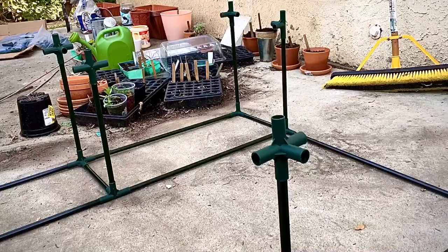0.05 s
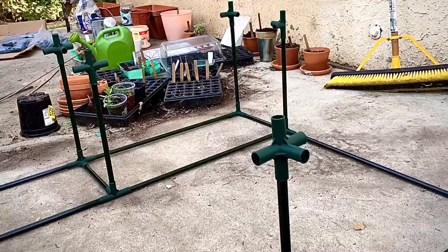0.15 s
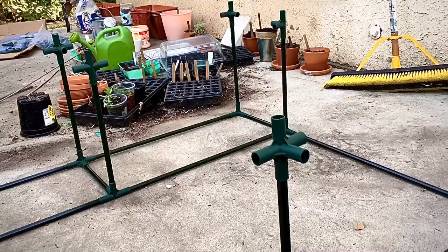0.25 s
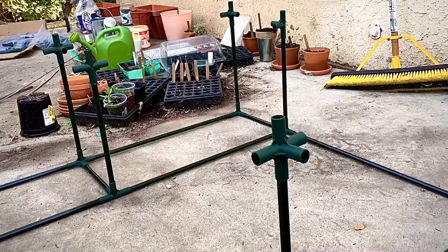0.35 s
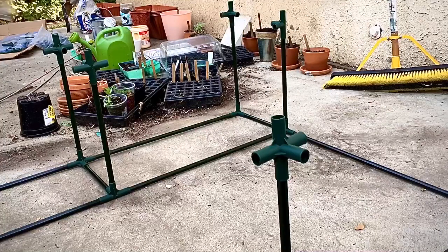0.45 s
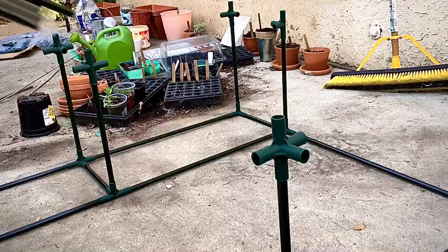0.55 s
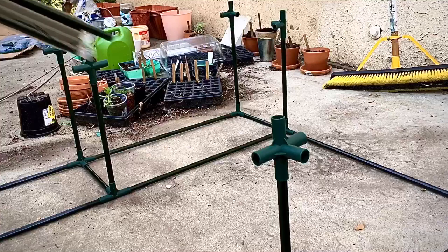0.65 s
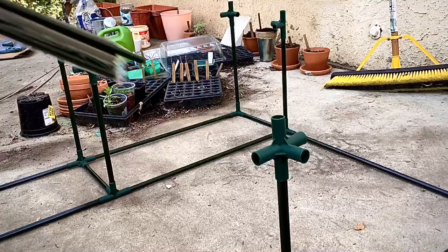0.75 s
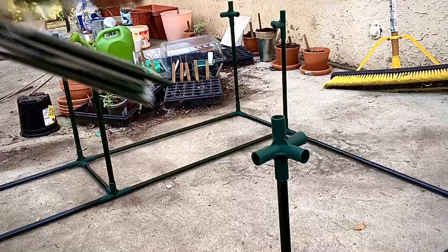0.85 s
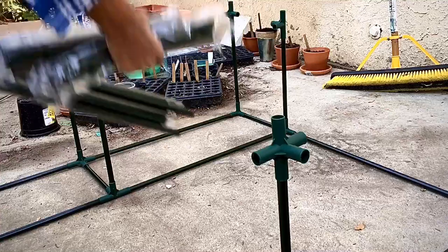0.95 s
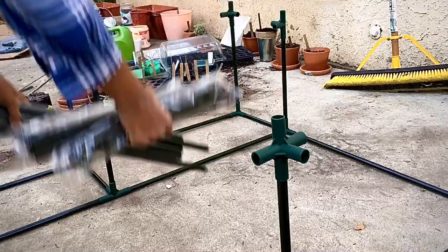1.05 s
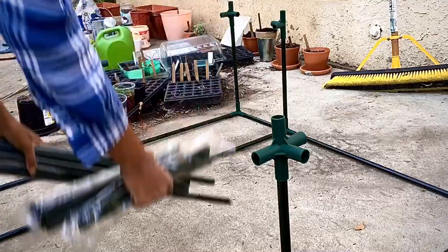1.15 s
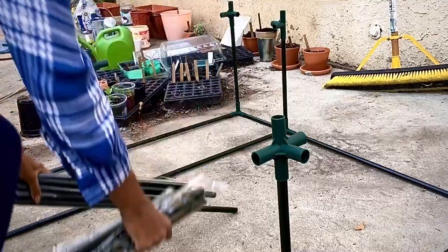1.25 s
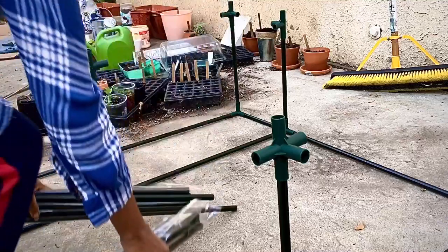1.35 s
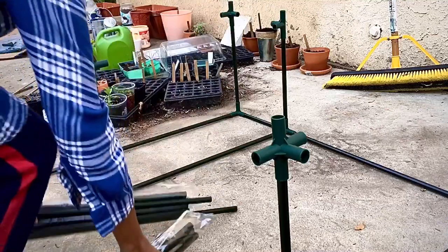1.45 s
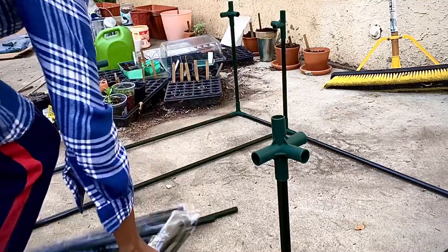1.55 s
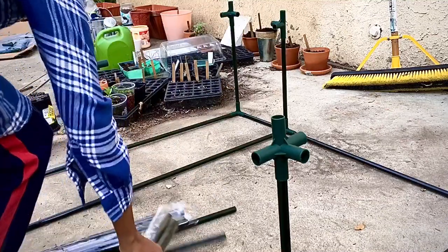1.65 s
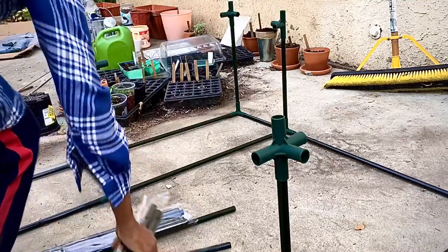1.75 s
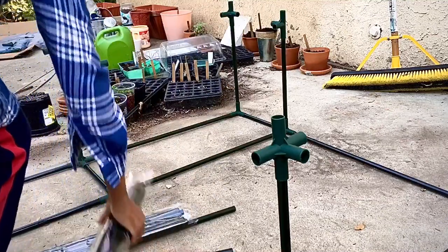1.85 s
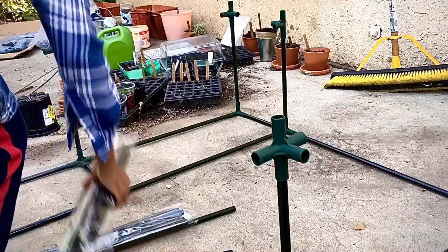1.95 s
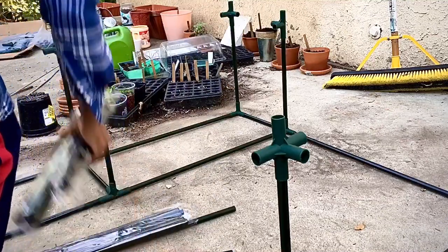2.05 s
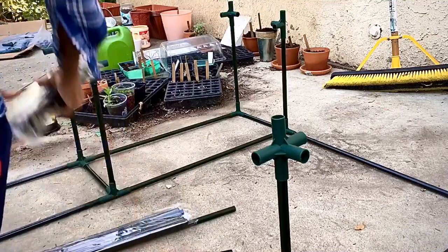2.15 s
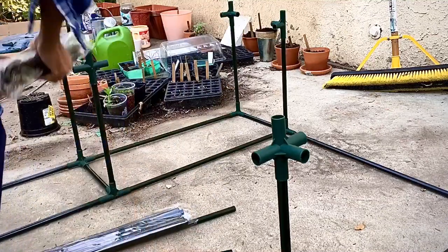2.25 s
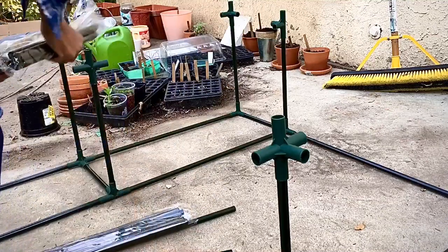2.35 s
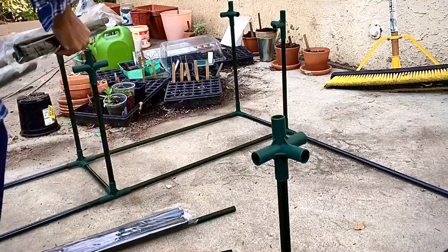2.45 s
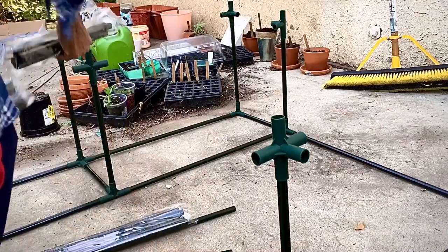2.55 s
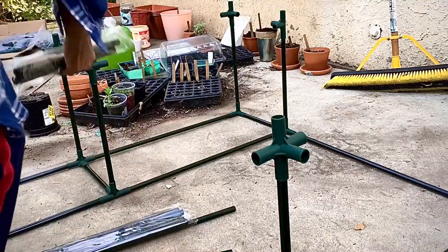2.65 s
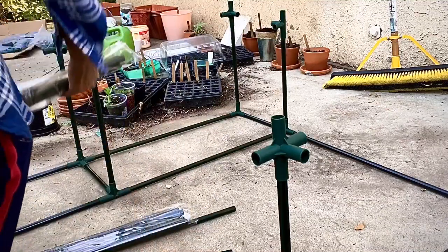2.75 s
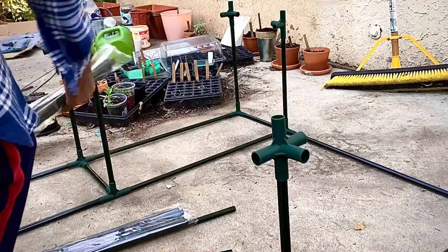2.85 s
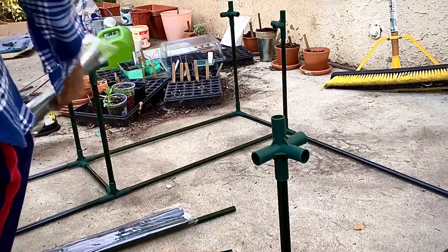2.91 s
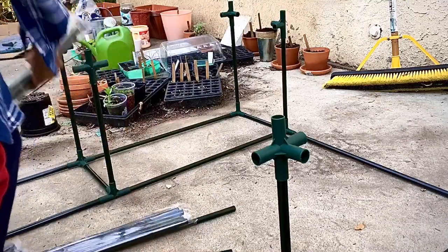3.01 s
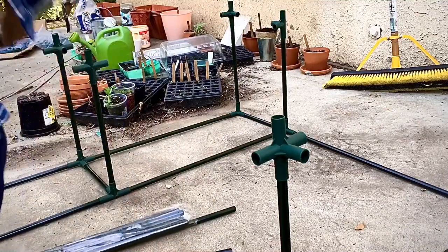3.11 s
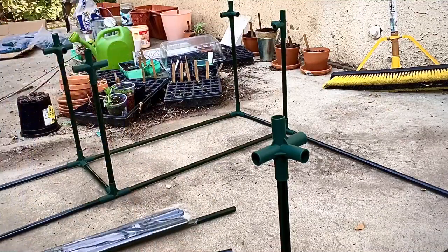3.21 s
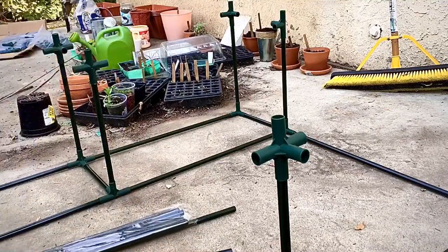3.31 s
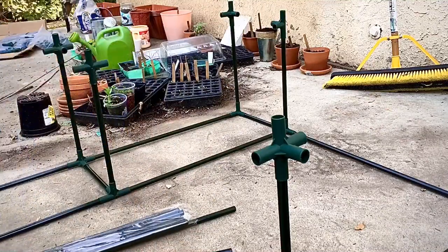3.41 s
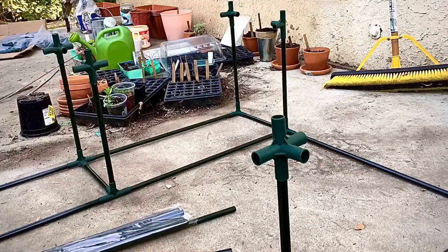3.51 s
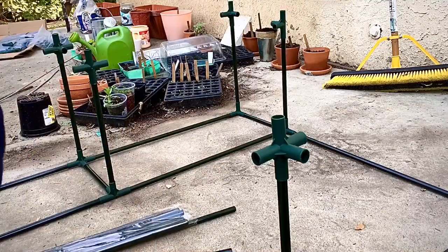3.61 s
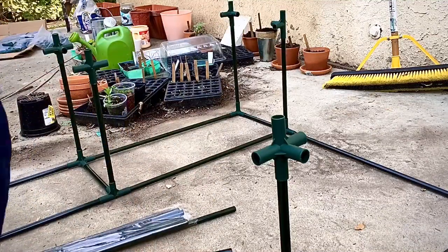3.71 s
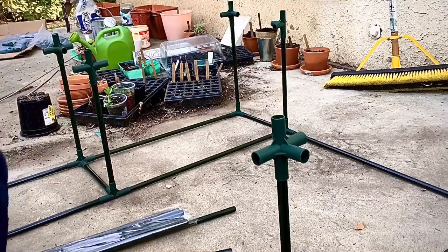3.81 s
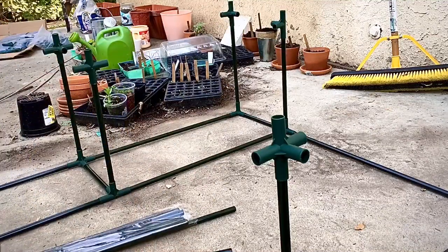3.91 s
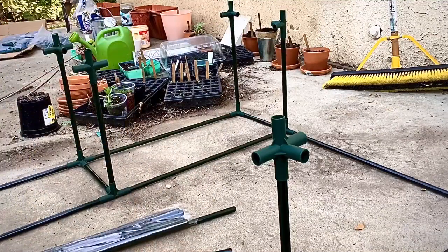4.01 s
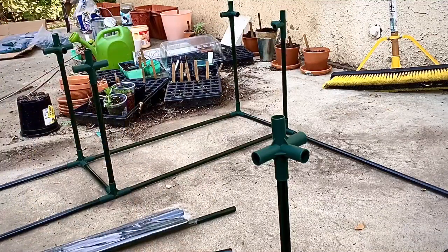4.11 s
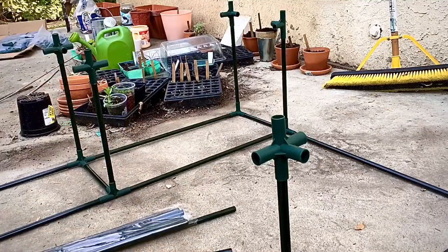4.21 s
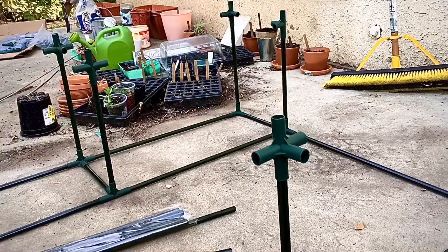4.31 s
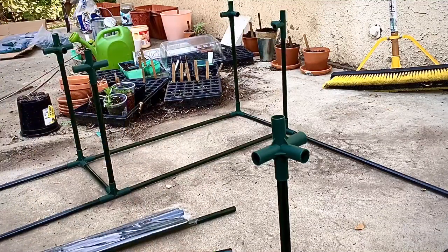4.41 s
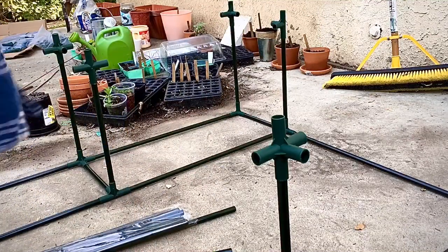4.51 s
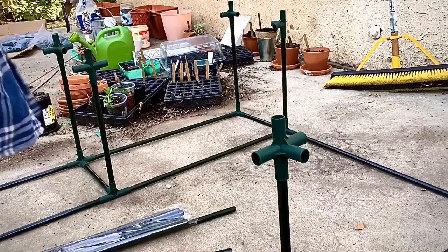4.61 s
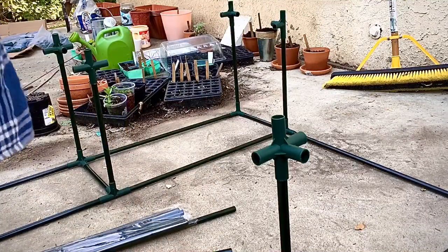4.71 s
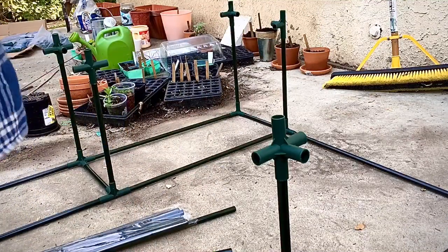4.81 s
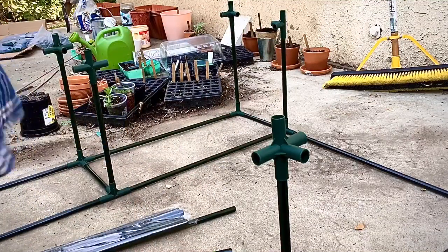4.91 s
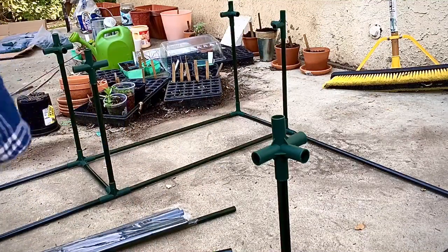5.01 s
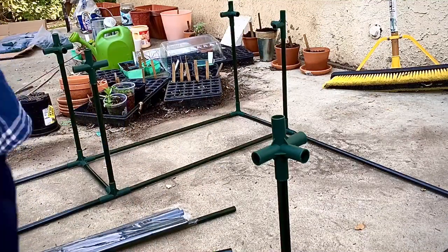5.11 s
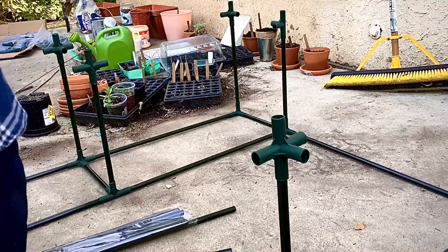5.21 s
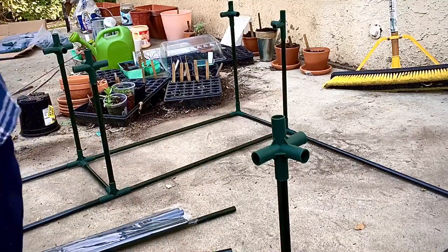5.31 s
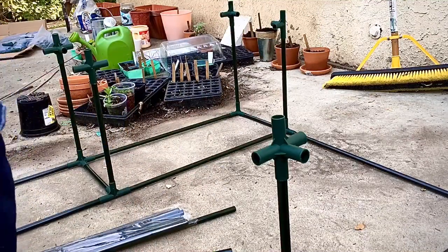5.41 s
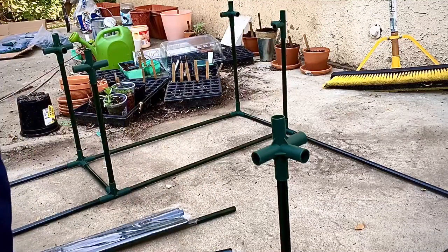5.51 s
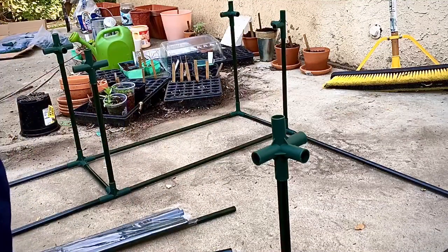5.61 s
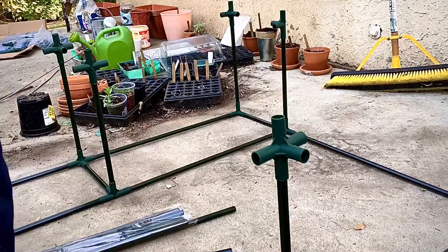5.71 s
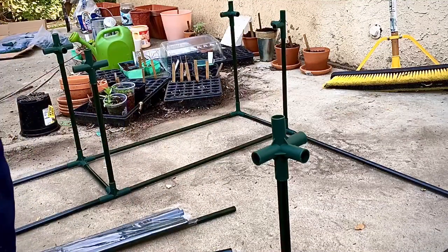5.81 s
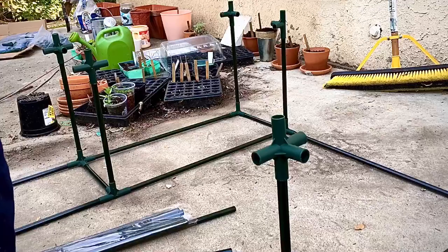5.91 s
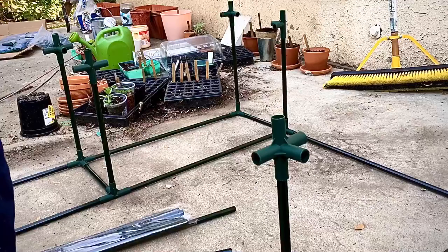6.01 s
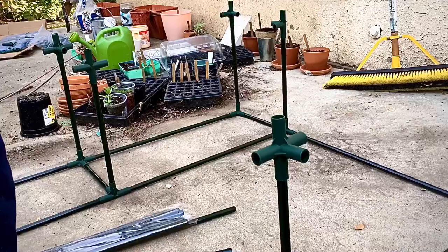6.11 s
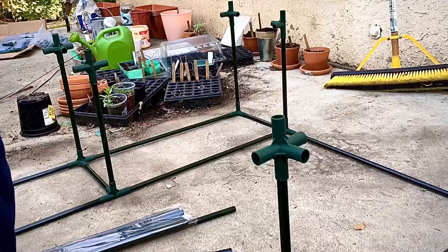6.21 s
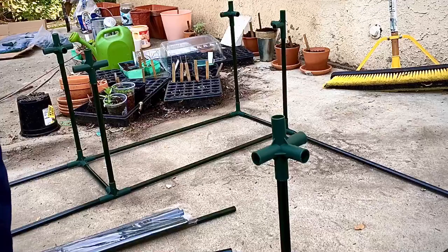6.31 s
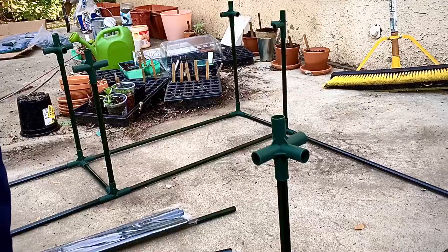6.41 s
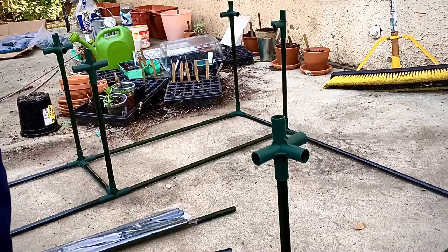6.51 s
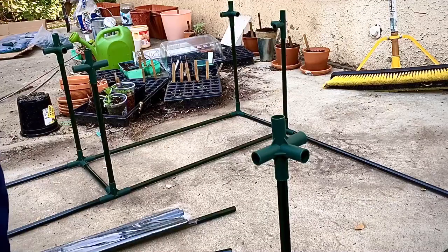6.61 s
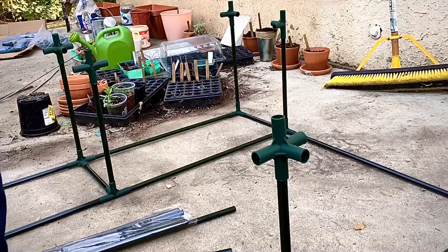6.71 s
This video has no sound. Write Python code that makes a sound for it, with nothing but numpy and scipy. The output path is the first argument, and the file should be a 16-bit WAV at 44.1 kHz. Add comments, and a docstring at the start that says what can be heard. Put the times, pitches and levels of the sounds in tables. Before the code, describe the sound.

Plastic-wrapped metal tubes crash down on a patio, jingling to rest, a second bundle knocks, then crisp plastic crackling with faint clinks.

```python
"""Concrete patio: bundles of thin steel poles in plastic sleeves are carried, knocked and laid down.
Sleeves rustle and snap: gated grit noise, noise bursts and short sine pings.
Bundles crash: noise bursts through clatter, tube and thud filters. Poles roll, ring and clink: sums of tube modes.
Far traffic rumbles (shaped noise) with a low hum (wavering sines); the recorder ducks its gain after loud crashes."""
import sys
import numpy as np
from scipy import signal
from scipy.fft import rfft, irfft, next_fast_len
from scipy.io import wavfile
from scipy.ndimage import uniform_filter1d, map_coordinates

SR = 44100
rng = np.random.default_rng(int(sys.argv[2]) if len(sys.argv) > 2 else 0)


def waveform_to_disk(signal):
    """Save audio, clipped to [-1, 1], as 16-bit WAV at the path in sys.argv[1]."""
    frames = np.transpose(np.atleast_2d(signal))
    scaled = np.clip(frames, -1, 1) * 32767
    samples = np.round(scaled).astype(np.int16)
    wavfile.write(sys.argv[1], SR, samples)


N = 297675

# far traffic rumble spectrum: (frequency [Hz], relative level [dB per Hz])
TRAFFIC_SPECTRUM = [(12, -72), (20, -48), (43, -6), (65, -6), (113, 4.5), (150, -5.5), (228, -7.5),
                    (310, -12.5), (410, -20.5), (542, -20), (624, -20.5), (678, -22), (1190, -22),
                    (1660, -32), (16000, -62)]
# hum fundamental: (time [s], level [dB])
HUM_LEVELS = [(0, -49), (.4, -56.5), (1.0, -44), (1.9, -58.5), (3.0, -47.5), (3.4, -47.5), (4.2, -42),
              (5.0, -50), (6.0, -40.5), (6.75, -52)]
# hum overtones: (multiple of the fundamental [1], level [dB])
HUM_OVERTONES = [(3, -62), (4, -61)]
# sleeves sliding in the hands: (start [s], length [s], rustle [dB], change by the end [dB],
# low part above rustle [dB])
SLIDES = [(0.654, .12, -59, -0.5, -3.5), (.79, .34, -72.5, 14, 1.5), (1.172, .13, -54, 3, 7),
          (1.331, .1, -55.5, 11.5, 6), (1.592, .12, -48, 4.5, 6.5), (1.75, .3, -51, -5.5, 4.5),
          (2.131, .13, -58.5, 6.5, 4.5), (2.31, .4, -75, -0.5, 3), (2.811, 0.16, -51.5, -16, 0.5),
          (3.11, .2, -30.5, -24.5, 1.5), (3.314, .1, -52, 2, 3.5), (3.426, 0.065, -68.5, -9, 4),
          (3.651, .12, -44.5, -14, 4), (3.8, .08, -53.5, -3.5, 3.5), (3.919, 0.21, -53, -3, 2),
          (4.155, 0.16, -50, -5.5, 1.5), (4.337, 0.12, -49.5, -4.5, 5.5), (4.49, 0.049, -64, -2, 2),
          (4.558, .1, -61.5, -11, 9.5), (4.688, 0.024, -57, -4.5, 1), (4.73, 0.12, -71, 0, 8),
          (4.843, .11, -47, -13.5, 4.5), (4.96, .04, -61.5, -4, 8.5), (5.012, .05, -50.5, -13, 5),
          (5.086, .06, -73, 0, -2), (5.15, .11, -61.5, -3, 0), (5.27, .24, -48.5, -13, 2.5),
          (5.531, .1, -70, 7.5, -2), (5.661, .25, -50, -5, 4.5), (5.935, .06, -64.5, -7, 3),
          (5.98, .19, -57.5, 15, -4), (6.22, .19, -54, 0.5, 3.5), (6.416, .2, -47.5, -10.5, -3.5),
          (6.645, .05, -40, -22, -6), (6.738, .03, -47.5, -16.5, 1)]
# folds snapping: (time [s], crack [dB], low part above crack [dB])
SNAPS = [(.6478, -44.5, -15), (0.6781, -29, -7), (0.6893, -38, -10), (0.7462, -23, -27), (0.835, -37, -24),
         (0.906, -46.5, -1), (0.9964, -41.5, 6), (1.0768, -40.5, -27), (1.1065, -52, 6), (1.2659, -33, -17),
         (1.395, -36.5, -21), (1.982, -24.5, -11.5), (2.1485, -37, 2.5), (2.2228, -37.5, -11),
         (2.2565, -40.5, -12), (2.3624, -36, 0.5), (2.4654, -38, -19), (2.5299, -36, -0.5),
         (2.5626, -31, -25), (2.669, -34.5, -23), (2.8148, -37.5, -10.5), (3.344, -32, -7),
         (3.48, -49, 0.5), (3.642, -36, -16), (3.717, -36, -22), (3.7622, -31, -8), (3.815, -33, 0),
         (3.8387, -31, -6.5), (3.8797, -35, 1.5), (3.927, -36.5, -3), (3.9907, -35, -28),
         (4.0333, -40.5, -23), (4.129, -42.5, -28), (4.158, -37.5, 5.5), (4.1745, -29, -32),
         (4.2198, -29, -8), (4.23, -34, -19), (4.2567, -30, -30), (4.335, -35, -24), (4.35, -36.5, -3),
         (4.4283, -31.5, -21), (4.459, -30, -33), (4.563, -31.5, -6.5), (4.601, -32.5, -17),
         (4.6476, -37, -12), (4.6923, -33.5, -0.5), (4.8377, -31, -9), (4.8852, -22.5, -10),
         (5.013, -28.5, -26), (5.148, -36, -15), (5.2011, -32.5, -14), (5.2692, -31.5, -2),
         (5.2885, -26.5, -20), (5.5486, -32, -11), (5.6045, -36.5, -10), (5.6693, -30, -20),
         (5.7988, -20, -27), (6.0014, -33, -27), (6.0547, -38, -4), (6.1116, -34, -4), (6.195, -29.5, -30),
         (6.22, -32, -14), (6.5168, -38.5, 1), (6.5524, -44, 5), (6.6124, -41, -10)]
# film spectra, crack and low part: (frequency [Hz], relative level [dB per Hz])
FILM_HIGH_SPECTRUM = [(1180, -26), (2000, -12), (4120, 0.5), (4450, -6.5), (5350, 0), (11400, 2),
                      (15200, -2), (16000, -5)]
FILM_LOW_SPECTRUM = [(240, -10), (400, 1), (500, -7), (588, 1.5), (773, -5), (1750, -0.5), (4500, -8.5),
                     (5850, -10), (9900, -120)]
# bundle crashes: (time [s], clatter [dB], low thud above clatter [dB], higher knock above clatter [dB],
# rise [s], T60 [s])
CRASHES = [(1.1403, -16.5, -8, -24, 0.0036, 0.11), (1.1556, -22.5, -19.5, -22.5, 0.0013, 0.13),
           (1.4462, -26.5, -10.5, -14, 0.0028, 0.22), (1.4755, -14.5, -20.5, -23, 0.0068, 0.062),
           (1.4905, -20, -11.5, -17, 0.0017, 0.25), (1.5115, -3, -9, -8, 0.0065, .12),
           (1.5275, -8.5, -5, -32, .005, 0.28), (1.5625, -14, -5, -23, .002, 0.064),
           (1.5994, -25, -10.5, -11.5, 0.0026, .2), (2.9352, -16, -15, -12, 0.0053, 0.23),
           (2.9543, -21.5, -22, -25.5, 0.00085, 0.16), (2.974, -17.5, -11, -8.5, 0.0026, 0.18),
           (2.9906, -6.5, -14.5, -9.5, 0.00066, 0.088), (3.004, -36, -20, -21, .002, 0.13),
           (3.0357, -23.5, -4.5, -16.5, .003, 0.38), (3.0933, -20, -23, -20, .004, 0.11),
           (3.135, -26, -23, -15, .004, 0.16), (3.18, -30, -20.5, -6, .004, 0.1)]
# clatter spectrum: (frequency [Hz], relative level [dB per Hz])
CLATTER_SPECTRUM = [(300, -36.5), (600, -1), (1400, -8), (3000, 1), (4300, -8.5), (6000, -6), (9000, -3.5),
                    (13000, -3.5), (15800, -11)]
# bundle on concrete, thud first, then knock: (frequency [Hz], width [Hz], relative level [dB])
THUD_MODES = [(232, 52, 9), (335, 120, -2), (490, 100, -3.5)]
# tube modes: (frequency [Hz], width [Hz], relative level [dB])
LONG_POLE_MODES = [(1170, 7.1, 1.5), (1230, 10, -11), (1918, 3.2, 4.5), (1938, 8, 0), (2900, 13, 6.5),
                   (2855, 15, -6), (3110, 13, -15.5), (3150, 16, 1), (3520, 20, -2.5), (3830, 5.1, -7),
                   (3866, 12, -1), (4500, 10, -11.5), (4792, 31, -16.5), (4950, 27, 1.5), (5016, 54, 3.5),
                   (5440, 13, -21), (6070, 21, 2), (6070, 6.1, -4), (6253, 7.3, 4.5), (6400, 25, -14.5),
                   (6550, 8, -7), (7550, 54, -7.5), (8450, 8.3, -3), (8600, 20, -10.5), (9700, 27, -3.5),
                   (10050, 17, -11), (11080, 48, -15), (12050, 23, 0), (13100, 31, -8)]
SHORT_POLE_MODES = [(1298, 15, 5.5), (1932, 64, -11), (2864, 21, -7), (2940, 34, -1.5), (3335, 24, -0.5),
                    (3394, 39, -6), (3850, 37, -5.5), (4767, 44, -1), (5040, 30, -10.5), (5720, 30, -5.5),
                    (6250, 18, 2), (6370, 34, -2.5), (7620, 46, -13.5), (8560, 88, -2.5), (9130, 25, -4.5),
                    (11300, 180, -8), (12150, 60, -13)]
# single clinks: (time [s], level [dB], upper modes above bending modes [dB])
LONG_CLINKS = [(1.1428, -38, -8), (1.4755, -28, -3.5), (1.5134, -31, 4), (1.7288, -39.5, 7.5),
               (1.8268, -42.5, 10.5), (1.8582, -44, 6), (1.8881, -45, 7.5)]
SHORT_CLINKS = [(2.818, -45, 3), (2.991, -28.5, 2), (3.105, -32, 5.5), (5.6944, -56, 3),
                (5.795, -41.5, 6.9), (6.3853, -50, 3.8), (6.6437, -31.5, 0.61), (6.7256, -44, 2.4)]
# long poles shifting, then rolling to rest: (time [s], ring [dB], upper modes above bending modes [dB])
ROLL = [(1.38, -64, -1.5), (1.45, -49.5, -6), (1.52, -33.5, 3), (1.58, -22, -5), (1.64, -29.5, -14.5),
        (1.69, -35.5, -13), (1.76, -30.5, -10), (1.81, -37.5, -9), (1.87, -38, -5.5), (1.97, -44.5, -9.5),
        (2.04, -52.5, -3.5), (2.13, -79, 0)]
# short poles shaken against each other: (peak time [s], ring [dB], middle modes above lowest [dB],
# high modes above lowest [dB], dying time [s])
JOLTS = [(2.85, -56.5, -4, -4.5, 0.15), (2.994, -27, 4, 1.5, .1), (3.035, -19.5, -3.5, -9.5, .1),
         (3.101, -36.5, 2.5, -1, .25), (5.537, -70.5, 15, 8, .06), (5.706, -52, 6, 7.5, .15),
         (5.824, -47.5, 9.5, 7, .14), (6.153, -45, 2.5, 3, .07), (6.332, -54, 6, 1.5, .1),
         (6.388, -38.5, -6, -8, .06), (6.458, -50, 3, -8, .05), (6.666, -49.5, 7, -3, .06),
         (6.735, -54.5, 2, 2, .08)]
# patio reverberation: (frequency [Hz], T60 [s])
PATIO_T60 = [(300, 0.39), (2000, 0.37), (12000, 0.3)]

TRAFFIC_DB, HUM_HZ = -45.5, 76.3
SLIDE_RISE_S, SLIDE_STOP_S, SLIDE_EDGE_DB = 0.019, 0.036, 31.5
IDLE_DB, IDLE_LOW_DB = -75.5, -66  # rustle between slides
CREEP_DB, CREEP_LOW_DB = -19, -11  # rustle after a snap, re its crack and its low part
PING_DB = -15  # pitch of a snap, re its crack
TICK_DB, TICK_SPREAD_DB = 10, 7.5  # over the rustle of the moment; spread per e-fold of the random size
TICK_TOP_DB, TICK_T60_S = -35.5, 0.0043  # loudest tick; decay
JOLT_RISE_S, JOLT_RANGE_DB = .04, 31.5
BENDING_TOP_HZ, MIDDLE_TOP_HZ = 2400, 4200  # upper edges of the bending and middle modes
TOP_HZ = 15850  # band limit


def amp(db):
    """Gain of a level in dB."""
    return 10 ** (np.asarray(db) / 20)


def unit(x):
    """x at rms 1."""
    return x / np.sqrt(np.mean(x ** 2) + 1e-20)


def along(points, hz):
    """Interpolates (Hz, value) points on a log-frequency axis."""
    point_hz, values = np.transpose(points)
    return np.interp(np.log(hz + 1), np.log(point_hz + 1), values)


def curves(rows):
    """Sample indices that the rows span, and one per-sample curve for each column after the time."""
    time_s, *columns = np.transpose(rows)
    first = max(round(time_s[0] * SR), 0)
    last = min(round(time_s[-1] * SR), N)
    span = np.arange(first, last)
    return span, *[np.interp(span / SR, time_s, column) for column in columns]


def wobble(rate, size=N):
    """Smooth random curve, rate knots per second."""
    knots = rng.standard_normal(int(size * rate / SR) + 4)
    return map_coordinates(knots, [np.arange(size) * rate / SR])


def filtered(x, response):
    """x through a complex response of frequency."""
    size = next_fast_len(N + SR // 2)
    spectrum = rfft(x, size) * response(np.fft.rfftfreq(size, 1 / SR))
    return irfft(spectrum, size)[..., :N]


def coloured(x, spectrum):
    """x through a (Hz, dB) spectrum that keeps white noise at its rms."""
    def gain(hz):
        return amp(along(spectrum, hz))
    power = np.mean(gain(np.fft.rfftfreq(4096, 1 / SR)) ** 2)
    return filtered(x, gain) / np.sqrt(power)


def resonant(x, modes):
    """x through parallel resonances of alternating sign, scaled so that white noise keeps its rms."""
    def response(f):
        total = 0
        for k, (hz, width, db) in enumerate(modes):
            damping = 1j * f * width
            total = total + (-1) ** k * amp(db) * damping / (hz * hz - f * f + damping)
        return total
    power = np.mean(np.abs(response(np.fft.rfftfreq(16384, 1 / SR))) ** 2)
    return filtered(x, response) / np.sqrt(power)


def grit(density, spread_db, bed):
    """Noise of rms 1: sparse contacts (density per second) of unequal size on a smooth bed."""
    sizes = np.minimum(rng.exponential(size=N), 3)
    contacts = (rng.random(N) < density / SR) * amp(spread_db * sizes)
    return unit(rng.standard_normal(N) * (bed + unit(contacts)))


def patchy(x, depth_db):
    """x with random gain in patches of time and frequency."""
    z = signal.stft(x, nperseg=256)[2]
    field = uniform_filter1d(rng.standard_normal(z.shape), size=7, axis=0)
    field = uniform_filter1d(field, size=6, axis=1)
    gain_db = depth_db * unit(field) - depth_db ** 2 / 9  # offset roughly holds the mean power
    return signal.istft(z * amp(gain_db), nperseg=256)[1][:N]


def traffic():
    """A far rumble that swells slowly, and a low wavering hum with faint overtones."""
    time_s, level_db = np.transpose(HUM_LEVELS)
    phase = 2 * np.pi * np.cumsum(HUM_HZ + 1.7 * wobble(7.1)) / SR
    hum_db = np.interp(np.arange(N) / SR, time_s, level_db) + 3.5 * wobble(12)
    hum = amp(hum_db) * np.sin(phase)
    for multiple, overtone_db in HUM_OVERTONES:
        hum += amp(overtone_db + 1.8 * wobble(2.8)) * np.sin(multiple * phase)
    rumble = coloured(rng.standard_normal(N), TRAFFIC_SPECTRUM)
    return hum + amp(TRAFFIC_DB + 0.71 * wobble(1.1)) * rumble


def slides():
    """Gains of the high and low rustle: each slide rises fast, drifts in level and stops."""
    level = amp([[IDLE_DB], [IDLE_LOW_DB]]) * np.ones(N + SR)
    for start, length, db, change_db, low_db in SLIDES:
        end, end_db = start + length, db + change_db
        span, slide_db = curves([(start - SLIDE_RISE_S, db - SLIDE_EDGE_DB), (start, db),
                                 (end, end_db), (end + SLIDE_STOP_S, end_db - SLIDE_EDGE_DB)])
        level[:, span] += amp([slide_db, slide_db + low_db])
    return level


def ticks(level, count):
    """Tiny dry ticks at random moments, louder where the film rustles more, with varied bass cut."""
    out, t = np.zeros(N + SR), np.arange(SR // 100) / SR
    for when, size, thin in rng.random((count, 3)):
        at = int(when * N)
        db = 20 * np.log10(level[at]) + TICK_DB - TICK_SPREAD_DB * np.log(size + .02)
        burst = signal.lfilter([1, -thin], [1], rng.standard_normal(len(t)))
        out[at:at + len(t)] += amp(min(db, TICK_TOP_DB) - 60 * t / TICK_T60_S) * burst
    return out[:N]


def sleeves():
    """Thin film crackles as it slides; folds snap with a short pitch of their own and rustle on as they settle."""
    level, low_level = slides()
    small = ticks(level, count=320)
    cracks, pings = np.zeros((2, N + SR)), np.zeros(N + SR)
    t = np.arange(SR // 15) / SR
    pitches_hz = 3000 * np.exp(.7 * np.clip(rng.standard_normal(len(SNAPS)), -2, 2))
    settle = np.exp(-(t / 0.015) ** 2) * (1 - np.exp(-t / 0.0026))  # the film keeps creeping, then stops
    unfold = 1 - np.exp(-t / np.array([[.0003], [.0015]]))  # the low part starts softer
    for (time_s, db, low_db), hz in zip(SNAPS, pitches_hz):
        start = round(time_s * SR)
        here = slice(start, start + len(t))
        decay = amp([db - 60 * t / 0.0072, db + low_db - 60 * t / 0.011])
        cracks[:, here] += decay * rng.standard_normal((2, len(t))) * unfold
        pings[here] += amp(db + PING_DB - 60 * t / 0.03) * np.sin(2 * np.pi * hz * t)
        level[here] += amp(db + CREEP_DB) * settle
        low_level[here] += amp(db + low_db + CREEP_LOW_DB) * settle
    surge_db = 2.0 * wobble(40)  # folds give way in clumps
    high = level[:N] * amp(surge_db + 1.14 * wobble(80)) * grit(density=1500, spread_db=9.5, bed=2.2)
    low = low_level[:N] * amp(surge_db + 0.4 * wobble(40)) * grit(density=610, spread_db=3.5, bed=1.8)
    high = patchy(high, depth_db=4.0) + cracks[0, :N] + small
    low = patchy(low, depth_db=4) + cracks[1, :N]
    return coloured(high, FILM_HIGH_SPECTRUM) + coloured(low, FILM_LOW_SPECTRUM) + pings[:N]


def crashes():
    """Many poles strike within milliseconds: dense clatter, partly rung through damped tubes, over a dull thud."""
    drive, t = np.zeros((3, N + SR)), np.arange(SR // 2) / SR
    for time_s, db, thud_db, knock_db, rise_s, t60_s in CRASHES:
        shape = (1 - np.exp(-t / max(rise_s, 1e-4))) * amp(-60 * t / max(t60_s, .01))
        start = round(time_s * SR)
        drive[:, start:start + len(t)] += amp([[db], [db + thud_db], [db + knock_db]]) * shape
    clatter, thud, knock = drive[:, :N]
    rattle = patchy(grit(density=2500, spread_db=3.0, bed=1.8), depth_db=0.5)
    sharp = clatter * coloured(rattle, CLATTER_SPECTRUM)
    # touching tubes ring short
    damped = [(hz, width + 110, db) for hz, width, db in sorted(LONG_POLE_MODES + SHORT_POLE_MODES)]
    rung = resonant(clatter * grit(density=1500, spread_db=-8.5, bed=0.58), damped)
    low = resonant(thud * rng.standard_normal(N), THUD_MODES[:1])
    low += resonant(knock * rng.standard_normal(N), THUD_MODES[1:])
    return sharp + amp(-3.5) * rung + low


def wall_modes(count, level_db, width):
    """Far above the bending modes the tube walls ring with a crowd of close, weak modes."""
    mode_hz = np.sort(rng.uniform(7000, 15600, count))
    return [(hz, width, level_db + rng.normal(0, 3)) for hz in mode_hz]


def jolts():
    """Level curves: each jolt swells quickly to its peak and dies away."""
    tables = []
    for peak_s, db, *colour_db, dying_s in JOLTS:
        edge_db = db - JOLT_RANGE_DB
        tables.append([(peak_s - JOLT_RISE_S, edge_db, *colour_db), (peak_s, db, *colour_db),
                       (peak_s + dying_s, edge_db, *colour_db)])
    return tables


def poles(modes, tables, clinks, flutter_db, flutter_rate):
    """Tube modes ring on while the poles jostle, each swelling on its own; clinks add decaying rings of all modes."""
    hz, width, db = np.transpose(modes)[..., None]
    upper = hz > BENDING_TOP_HZ
    out, t = np.zeros(N + SR), np.arange(SR // 4) / SR
    for rows in tables:
        span, level_db, *above_db = curves(rows)
        upper_db = np.where(hz > MIDDLE_TOP_HZ, above_db[-1], above_db[0])
        flutter = np.array([wobble(flutter_rate, size=len(span)) for _ in modes])
        flutter *= np.where(upper, 1, .65)  # the low bending modes hold their note better
        flutter += 0.36 * wobble(69.8, size=len(span))  # each touch shakes all modes at once
        steps = rng.standard_normal(flutter.shape)
        wander = np.cumsum(steps, axis=1) * np.sqrt(2 * np.pi * width / SR)  # sets the line width
        start_phase = rng.uniform(0, 2 * np.pi, hz.shape)
        gain = amp(level_db + upper * upper_db + db + flutter_db * flutter)
        tones = gain * np.sin(2 * np.pi * hz * span / SR + start_phase + wander)
        out[span] += tones.sum(axis=0)
    for time_s, peak_db, bright_db in clinks:
        mode_db = db + bright_db * upper + rng.normal(0, 3, hz.shape)
        decay = np.exp(-np.pi * (width + 20) * t) * (1 - np.exp(-t / 0.0011))
        tones = amp(mode_db) * decay * np.sin(2 * np.pi * hz * t)
        start = round(time_s * SR)
        out[start:start + len(t)] += amp(peak_db) * tones.sum(axis=0)
    return out[:N]


def patio(x):
    """Walls and floor answer with a noise tail; each frequency dies at its own speed."""
    hz, t, z = signal.stft(rng.standard_normal(SR // 2), SR, nperseg=256)
    decay = amp(-60 * t / along(PATIO_T60, hz)[:, None])
    tail = signal.istft(z * decay, SR, nperseg=256)[1]
    delayed = np.pad(x, (200, 0))  # samples
    return signal.fftconvolve(delayed, tail / np.linalg.norm(tail))[:N]


def scene():
    """All handled things share the patio; traffic stays dry."""
    near = crashes() + sleeves()
    long_modes = LONG_POLE_MODES + wall_modes(count=40, level_db=-15.5, width=40)
    near += poles(long_modes, [ROLL], LONG_CLINKS, flutter_db=6, flutter_rate=36.5)
    short_modes = SHORT_POLE_MODES + wall_modes(count=14, level_db=-11.5, width=59)
    near += poles(short_modes, jolts(), SHORT_CLINKS, flutter_db=4.5, flutter_rate=44.4)
    return (near + amp(-16.5) * patio(near) + traffic())[None]


def record(dry, knee_db=-30, slope=0.51, lags_s=(0.021, 0.066)):
    """Gain control lags behind loud sound and recovers late; the highest peaks round off; then the band limits."""
    power = dry ** 2
    for lag_s in lags_s:  # two smoothing stages in series
        keep = np.exp(-1 / (lag_s * SR))
        power = signal.lfilter([1 - keep], [1, -keep], power)
    over_db = np.maximum(10 * np.log10(power + 1e-12) - knee_db, 0)
    ducked = dry * amp(-slope * over_db)
    rounded = ducked / (1 + np.abs(ducked / .85) ** 6) ** (1 / 6)
    return filtered(rounded, lambda hz: (hz < TOP_HZ) / (1 + (35 / (hz + 1)) ** 4))


dry = scene()
out = record(dry)
waveform_to_disk(out)
```